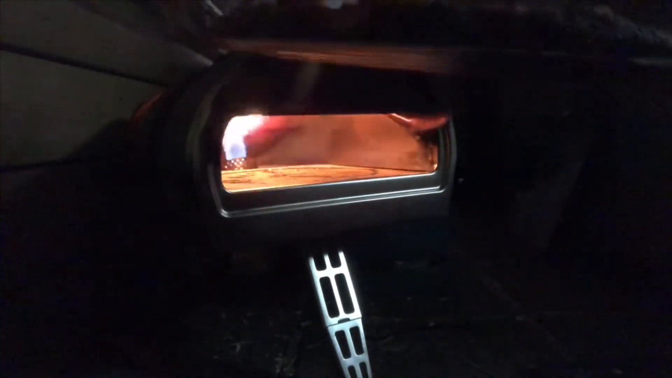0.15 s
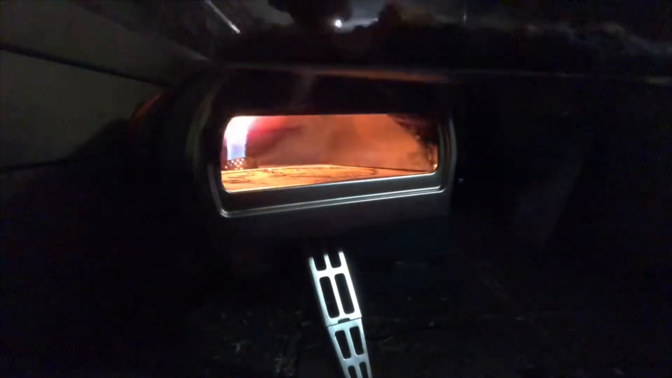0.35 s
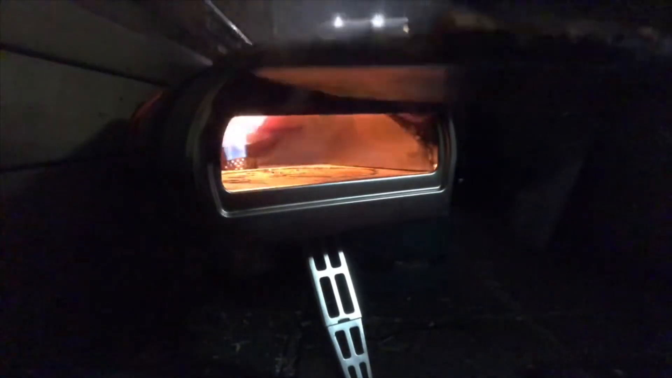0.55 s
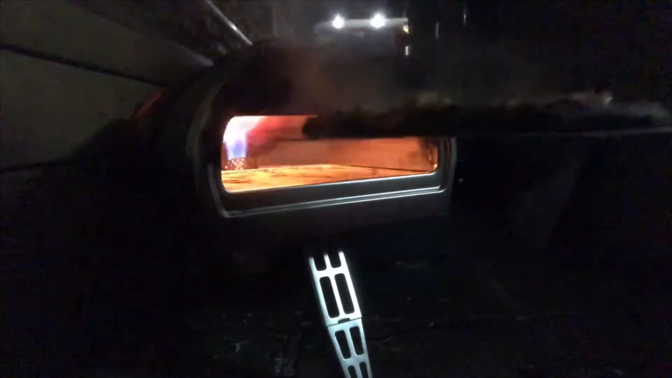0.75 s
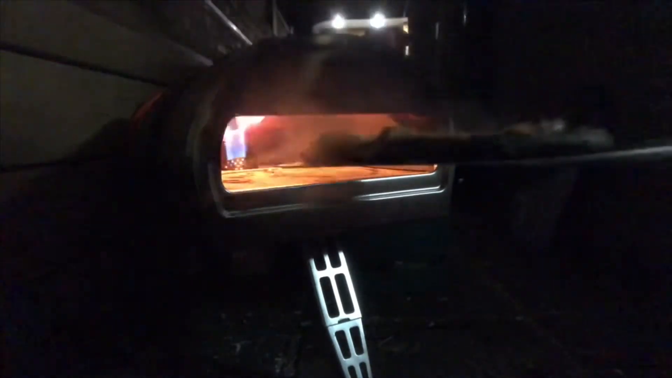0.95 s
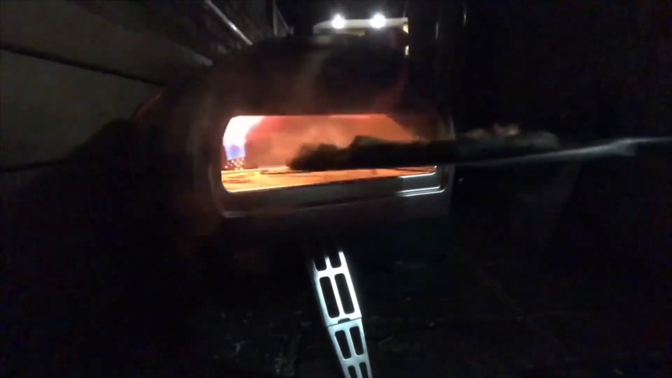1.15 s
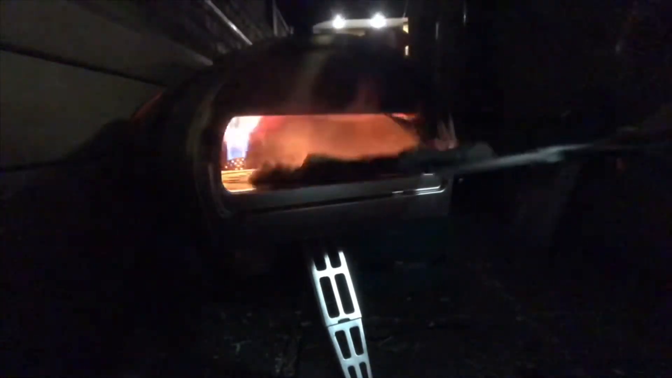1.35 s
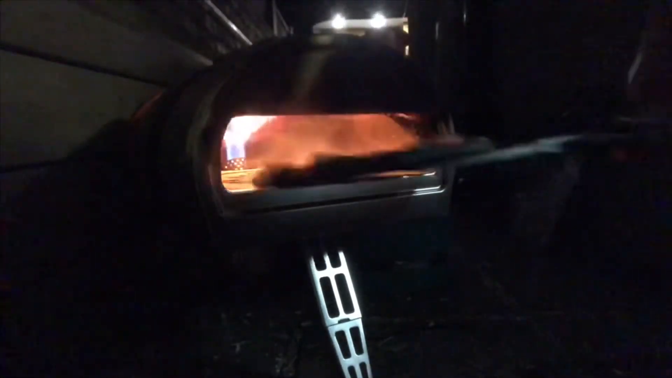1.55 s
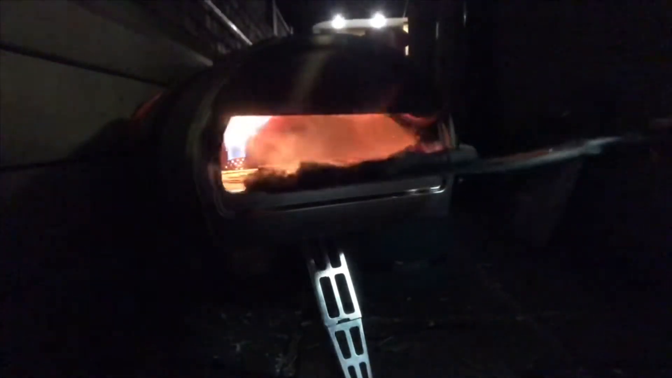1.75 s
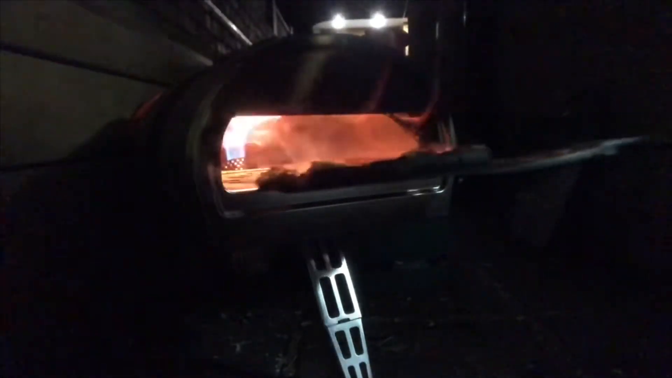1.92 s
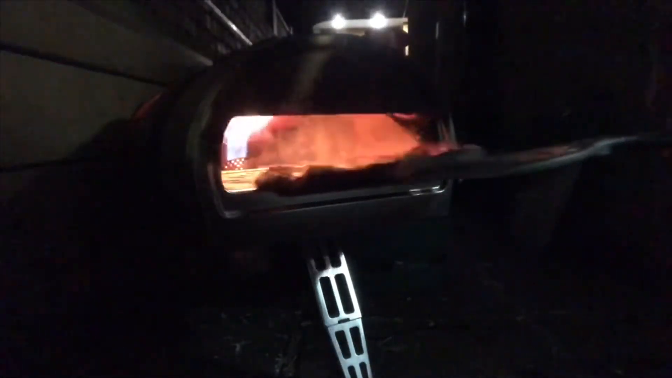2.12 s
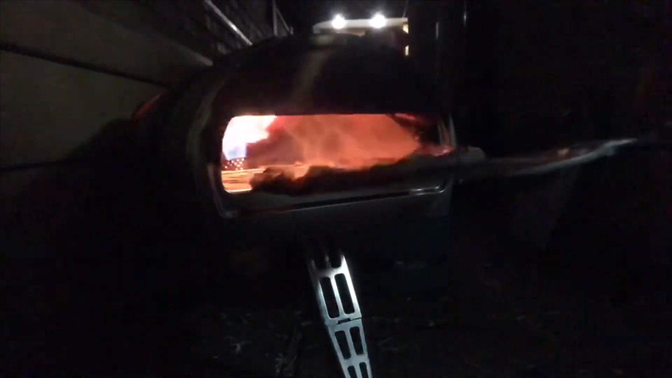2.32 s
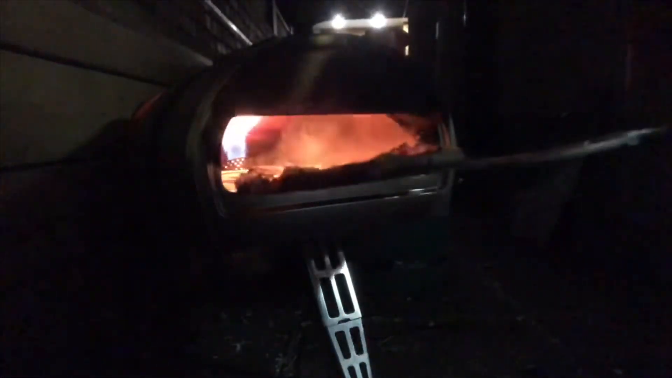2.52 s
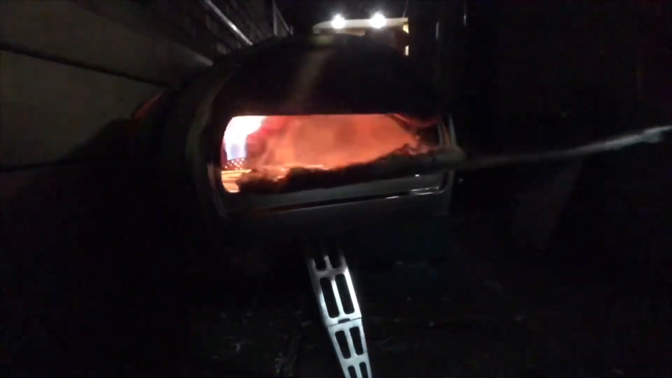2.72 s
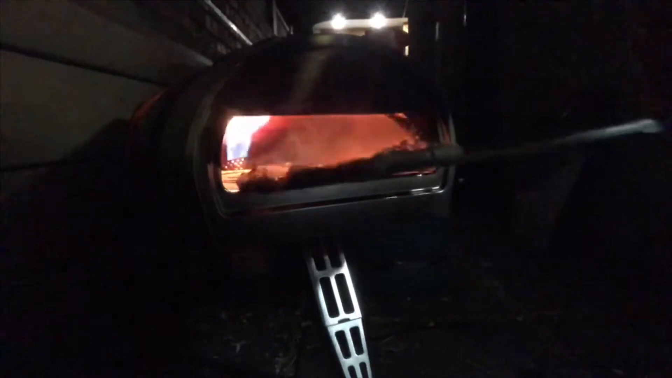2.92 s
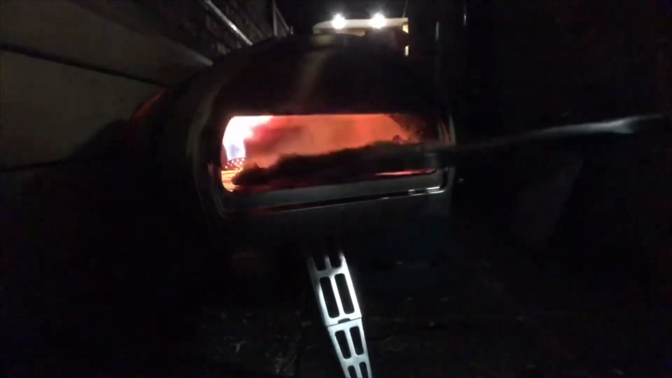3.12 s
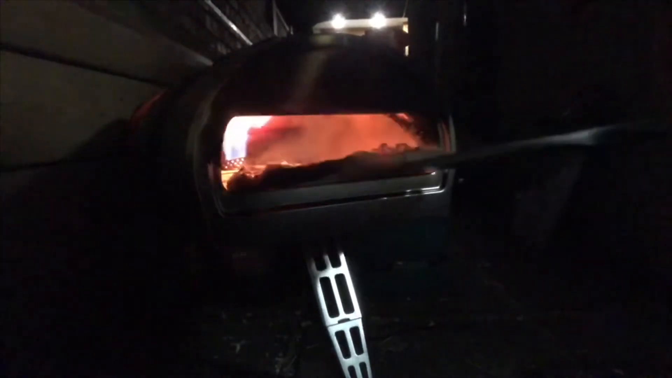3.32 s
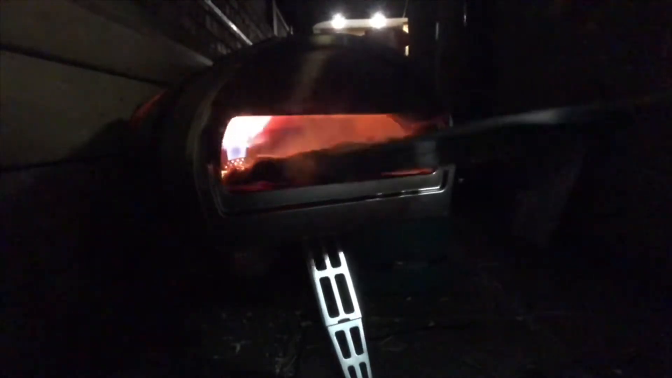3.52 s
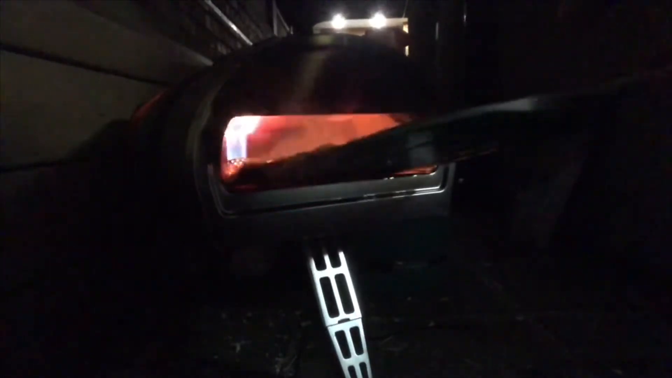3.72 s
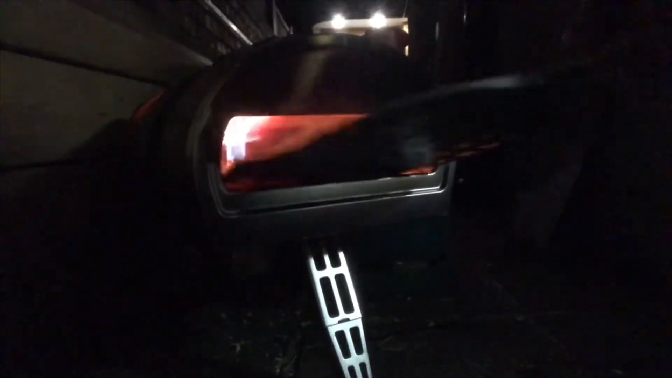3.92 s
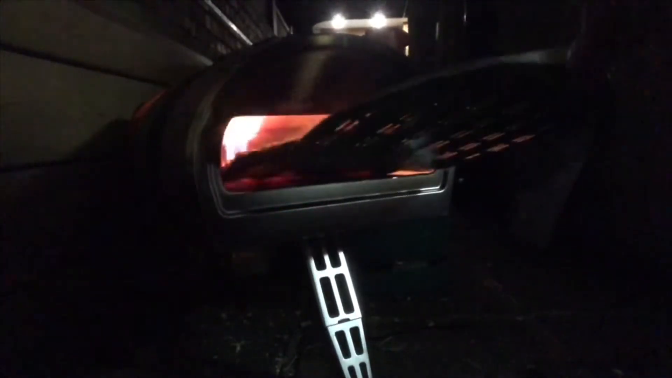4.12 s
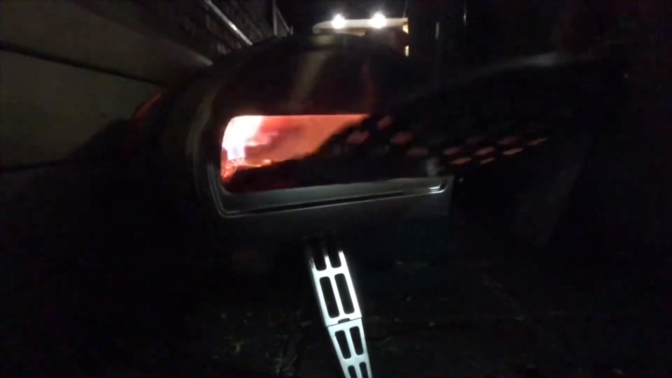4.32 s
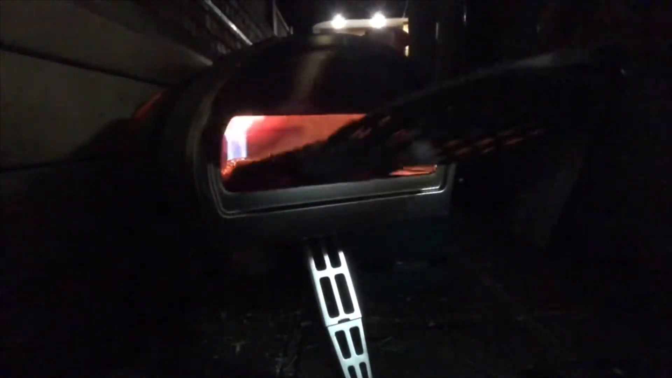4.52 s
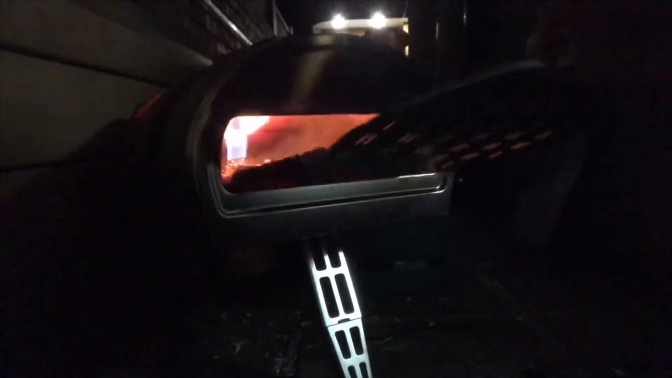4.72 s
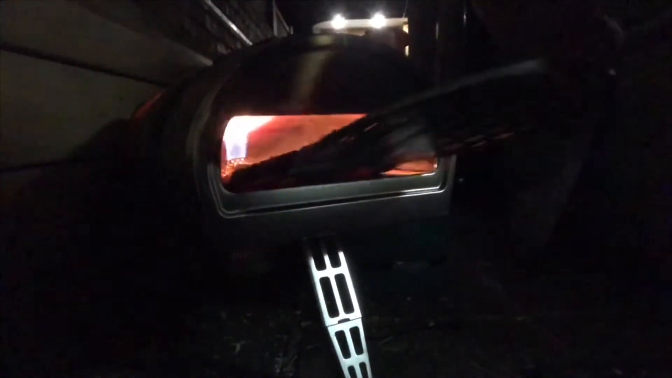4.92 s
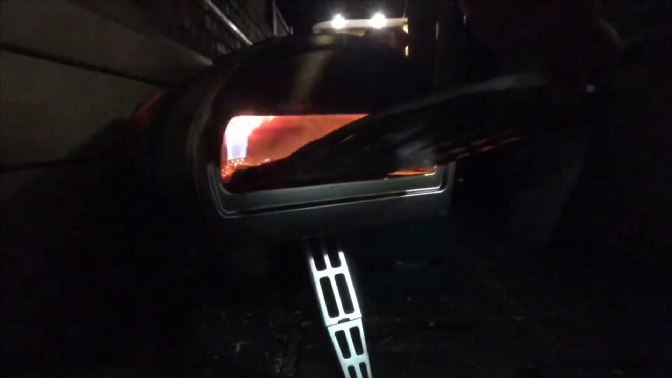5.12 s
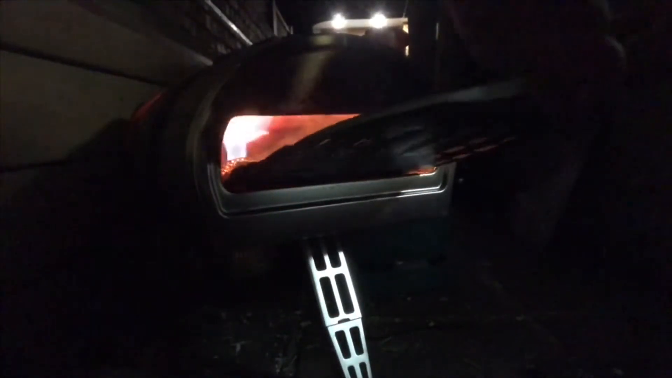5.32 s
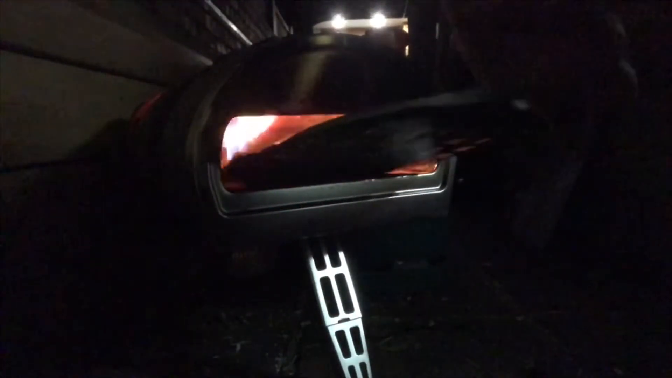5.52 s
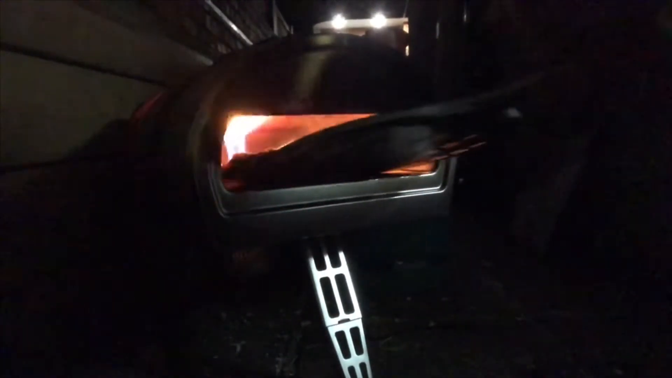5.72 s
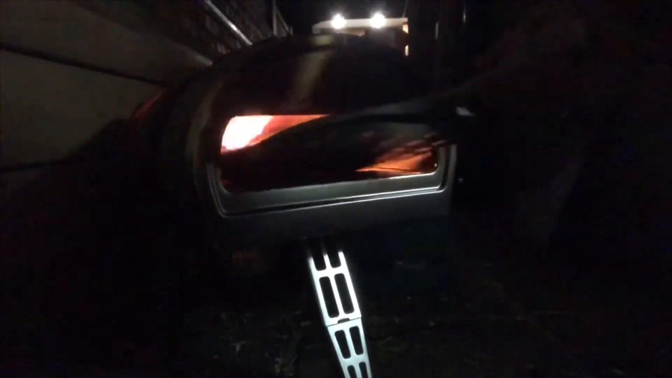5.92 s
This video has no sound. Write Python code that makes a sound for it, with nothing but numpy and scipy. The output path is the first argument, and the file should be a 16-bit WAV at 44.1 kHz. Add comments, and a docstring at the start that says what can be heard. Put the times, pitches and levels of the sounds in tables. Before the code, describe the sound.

A gas burner in a small outdoor pizza oven rumbles and hisses quietly and steadily throughout, heard in mono from in front. Around 0.2 to 0.4 seconds a few crumbs crackle in tiny dry snaps. At 1.4 seconds a thin metal peel lands on the stone floor with a clack and is worked back and forth in short, gritty scrapes, several a second, with light rubbing between them. Many shoves end in a brief low hum as the blade flexes. Irregular hollow knocks of its edge draw short booms from the oven, with a firm one at 1.8 seconds. Scrapes and knocks grow stronger around 3.8 to 4.1 seconds, then turn sparser while the tilted blade rings more freely until about 5.2. The loudest sound, a sharp clack, comes at 5.6 seconds, followed by strong rasping shoves at about 5.9 and 6 seconds.

```python
"""A gas burner rumbles and hisses and a few crumbs crackle: a small oven outdoors, heard in mono from
one spot in front of it. Then a thin metal peel lands on the stone floor and is worked back and forth.
Each shove drags the blade over grit and ends in a low hum as the peel flexes. Its edge knocks on
the stone, the sheet rings, and the oven cavity answers both the knocks and the grinding."""
import sys
import numpy as np
from scipy import signal
from scipy.fft import rfft, irfft, next_fast_len
from scipy.io import wavfile

SR = 44100
rng = np.random.default_rng(int(sys.argv[2]) if len(sys.argv) > 2 else 0)


def wrap_up_sound(samples):
    """Save the sound to the file named by the first command line argument, as 16-bit audio."""
    columns = np.atleast_2d(samples).T
    # keep every value between -1 and 1, then stretch to whole-number steps
    tamed = np.clip(columns, -1, 1)
    steps = np.round(tamed * 32767).astype(np.int16)
    wavfile.write(sys.argv[1], SR, steps)


N = 267246
TIME = np.arange(N) / SR
LANDING_S = 1.363   # the blade first touches the stone
GRIND_HZ, RASP_HZ, HISS_HZ = (400, 2000), (2000, 5000), (5000, 15500)
BOOM_LOSS = 0.23   # dB lost per dB of free ringing: a tilted blade passes less on to the oven

# shoves of the peel, at full speed from start to end: start_s, end_s, rise_s, level_db, pressure_db, hum_db
SHOVES = [(1.363, 1.413, .003, -40.5, -6, -48), (1.465, 1.507, 0.0022, -40, -10.5, -45),
          (1.599, 1.612, 0.017, -34.5, -7, -51), (1.703, 1.74, 0.016, -31.5, -6, -39.5),
          (1.78, 1.845, 0.028, -52.5, -13, -50), (1.918, 1.966, 0.014, -41.5, -13.5, -40.5),
          (1.977, 2.033, 0.03, -51, -3.5, -54), (2.187, 2.212, 0.0095, -42, 4, -40),
          (2.32, 2.328, 0.02, -40, 0, -38.5), (2.377, 2.402, 0.0047, -40.5, 5, -67),
          (2.483, 2.5, 0.013, -37, -8.5, -43), (2.547, 2.624, 0.022, -44, 0, -44),
          (2.688, 2.732, 0.014, -41, -12, -40), (2.808, 2.846, 0.022, -46, 4.5, -42),
          (2.995, 3.048, 0.027, -37.5, -2, -45), (3.266, 3.298, 0.01, -61, -10, -43),
          (3.508, 3.53, .018, -44, -6.5, -47.5), (3.606, 3.665, 0.028, -37.5, 5, -39.5),
          (3.728, 3.757, 0.0098, -38, -2.5, -50), (3.842, 3.885, 0.0073, -35, 0, -34),
          (3.972, 4.005, 0.025, -26.5, -6.5, -37), (4.04, 4.055, 0.014, -37, 4.5, -30.5),
          (4.068, 4.081, .005, -38, 6.5, -40), (4.248, 4.292, 0.0091, -53.5, 7, -69),
          (4.3, 4.307, 0.011, -42, -16, -68), (4.53, 4.536, 0.0076, -32, -2, -47.5),
          (4.72, 4.773, 0.021, -39, 2.5, -53), (4.976, 5.228, 0.0089, -55.5, -7, -54),
          (5.285, 5.41, 0.025, -43, -9, -49), (5.545, 5.628, .018, -32, -10.5, -65.5),
          (5.752, 5.79, .017, -32.5, -10, -68), (5.862, 5.93, 0.016, -28, -6.5, -28.5),
          (6.014, 6.055, 0.019, -26.5, -12.5, -42)]
# bending modes of the whole peel: pitch_hz, gain_db, t60_s
BENDING_MODES = [(151, -10, 0.096), (206, -9.5, 0.22), (239.7, 1, 0.16), (320, -3.5, 0.082)]
# modes of the oven cavity: pitch_hz, gain_db, t60_s
CAVITY_MODES = [(316.4, 2.5, 0.13), (360, -3.5, 0.14), (461.6, -2.5, 0.093), (569, 4, 0.04),
                (646, -8.5, 0.1), (717.4, -13.5, 0.28), (775.5, -7.5, 0.1), (1050, -4, 0.066)]
# spectrum of metal rubbing on stone: frequency_hz, gain_db
FRICTION_SPECTRUM = [(210, -5), (350, 6.5), (398, -3), (696, -9), (857, -2), (1240, -3), (1360, -7),
                     (2100, -11), (5840, -8), (11800, -13), (16000, -20)]


def scrape(judder_db, flicker_db, squeal_range_hz):
    """Each shove drags the blade over grit: pressed hard it grinds low and hollow, held lightly it hisses."""
    # hollow centre of the grind, lower and stronger under pressure: pressure_db, pitch_hz, gain_db
    grind_centre = [(-7.5, 1666, -1.5), (-2.5, 1346, 5), (2.5, 1200, 8), (3.5, 1244, 6.5)]
    pressures, *centre = np.transpose(grind_centre)
    friction = hollow(colour(grit(per_s=2400, size_db=3, smooth_db=-4.5), FRICTION_SPECTRUM))
    judder = judder_db * drift(per_s=260)   # stick and slip shake all three bands together
    shakes = [from_db(db + judder + flicker_db * drift(per_s=38)) for db in (0, 0, 0.3)]
    low_hz, high_hz = squeal_range_hz
    out = np.zeros(N)
    for start, end, rise, level, pressure, _ in SHOVES:
        place, pitch = rng.random(2)
        span = slice(int((start - 0.1) * SR), int((end + 0.3) * SR))
        centre_hz, centre_db = (np.interp(pressure, pressures, column) for column in centre)
        squeal_hz = low_hz * (high_hz / low_hz) ** pitch
        hiss_db = -1.5 - 0.3 * pressure - 0.13 * free_ring_db(end)   # a tilted blade sweeps less grit
        rub = np.roll(friction, int(place * N))[span]
        grind = from_db(centre_db) * resonate(rub, centre_hz, width_hz=57)
        squeal = resonate(rub, squeal_hz, width_hz=140)
        rub = roll_off(rub + grind + squeal, top_hz=11800 * from_db(hiss_db))   # light shoves reach higher
        bands = zip((GRIND_HZ, RASP_HZ, HISS_HZ), (pressure, 0, hiss_db), shakes)
        shove = sum(from_db(level + db) * shake[span] * rms_one(band(rub, hz)) for hz, db, shake in bands)
        shove *= shove_speed(TIME[span], start, end, rise)
        shove = sheet_ring(shove, ring_db=free_ring_db(end) + 0.5, width_hz=25)
        add(out, TIME[span][0], reflections(shove, wet_db=2, t60_s=0.027))
    return out


def shove_speed(time, start, end, rise, coast_s=0.026):
    """Speed of the blade in one shove, 0 to 1: it rises, holds and coasts to a stop."""
    envelope = np.exp(-np.maximum(start - time, 0) / rise - np.maximum(time - end, 0) / coast_s)
    return envelope * (time > LANDING_S)


def knocks(clack_db, clack_width_hz, crunch_s, tail_s, tail_db, boom_limit_db):
    """The edge hits the stone: a brief crunch, a hollow clack, a thud of the peel and a boom of the cavity."""
    # blows (crunch and thud relative to level, hiss to crunch): time_s, level_db, crunch_db, hiss_db, thud_db
    blows = [(1.363, -27, 1, -14, -12), (1.439, -28.5, -11, -12, 1), (1.462, -44, 2, 0, 4),
             (1.562, -35.5, -6, -6, 11), (1.849, -17.5, -12, -0.5, -7.5), (2.185, -24, -17, -1, -7),
             (2.213, -27.5, -15, 3, -6), (2.394, -28.5, -7, -7, -7), (2.453, -29, -7, -6, -6),
             (2.576, -23.5, -6, -2.5, -13), (2.792, -28.5, -9, -18, 1.5), (3.133, -29.5, 0.5, -5, 2),
             (3.335, -33, -11.5, 4, -12), (3.414, -40, -1, 3, -1), (3.567, -40, 8, -7, -10),
             (3.801, -28.5, -7.5, -8, -3), (3.844, -19, -36, 1, -22), (4.011, -18, 1, -7, -8),
             (4.055, -32.5, 8.5, -6, -3), (4.196, -33, -7, -13, -2), (4.475, -26, -5, 0.5, 3),
             (4.64, -31, -7, -8.5, -5), (4.787, -24.5, -10, -2.5, -3), (5.115, -38, -10.5, -17, -2),
             (5.257, -38, 4.5, -2, -5), (5.463, -23.5, -15, -9, -13), (5.616, -4, -13, -1.5, -7),
             (5.682, -24, -13, 4, 3), (5.864, -21.5, -18, 6, -6)]
    # harder blows clack lower: level_db, pitch_hz
    clack_pitch = [(-39, 1240), (-22.5, 1240), (-1, 924)]
    age, out = TIME[:SR // 3], np.zeros(N)
    fade = np.exp(-age / crunch_s) + from_db(tail_db) * np.exp(-age / tail_s)
    fade_rms = np.sqrt(np.mean(fade ** 2))
    build = 1 - np.exp(-age / 0.0058)   # the low modes take a few cycles to fill
    bite = 1 - np.exp(-age / 0.00044)   # the edge digs into the grit just after it lands
    for s, level, crunch_db, hiss_db, thud_db in blows:
        hz = np.interp(level, *np.transpose(clack_pitch))
        burst = rng.standard_normal(len(age)) * fade
        force = burst + 5.6 * (age == 0)   # the first contact carries most of the force
        clack = hollow(resonate_twice(force, hz, clack_width_hz))
        clack = rms_one(band(clack, (300, 1.365 * hz)))   # a blunt contact has little above its centre
        rasp = rms_one(band(burst * bite, RASP_HZ))
        hiss = rms_one(band(roll_off(burst * bite, top_hz=4270), HISS_HZ))
        crunch = sheet_ring(rasp + from_db(hiss_db) * hiss, ring_db=3, width_hz=7.2)
        hit = fade_rms * (from_db(clack_db) * clack + from_db(crunch_db + 0.5) * crunch)
        thud = from_db(level + thud_db - 5) * struck(BENDING_MODES, age, spread_db=4)
        boom_db = min(level - 12 - BOOM_LOSS * free_ring_db(s), boom_limit_db)
        boom = from_db(boom_db) * struck(CAVITY_MODES, age, spread_db=3.5)
        add(out, s, from_db(level) * hit + build * (thud + boom))
    return disperse(band(out, (115, 16000)), corner_hz=260, stages=12)


def flex(hum_db, wander_hz, rough_db, rumble_db, lead_s, half_s):
    """Just before a shove ends the blade catches: the main bending mode hums and other low modes shake."""
    swell = np.sqrt(sum(from_db(db) ** 2 * bell_curve(end - lead_s, half_s) for _, end, *_, db in SHOVES))
    hum_hz = BENDING_MODES[2][0] + wander_hz * drift(per_s=38)
    hum = np.sqrt(2) * np.sin(2 * np.pi * np.cumsum(hum_hz) / SR)
    shaking = rng.standard_normal(N)
    cavity = sum(from_db(db) * resonate(shaking, hz, width_hz=37) for hz, db, _ in CAVITY_MODES[:3])
    rumble = rms_one(cavity + 1.15 * resonate(shaking, BENDING_MODES[1][0], width_hz=81))
    return swell * (from_db(hum_db + rough_db * drift(per_s=110)) * hum + from_db(rumble_db) * rumble)


def light_rub(gain_db, unrest_db):
    """Once it has landed, the blade keeps rubbing lightly, also between shoves."""
    # strength of the light rubbing: time_s, level_db
    rub_levels = [(1.4, -50), (1.95, -54.5), (2.1, -57), (2.3, -49), (3.2, -54), (4.4, -54.5), (4.9, -55),
                  (6.06, -54)]
    friction = hollow(colour(grit(per_s=1500, size_db=2.5, smooth_db=5), FRICTION_SPECTRUM))
    rub = rms_one(sheet_ring(band(friction, (400, 11000), order=1), ring_db=-0.5, width_hz=62))
    level_db = gain_db + np.interp(TIME, *np.transpose(rub_levels)) + unrest_db * drift(per_s=28)
    return rub * from_db(level_db) * (TIME > LANDING_S)


def grit(per_s, size_db, smooth_db):
    """Grains snap under the blade, over the smooth rub of stone."""
    sizes = from_db(size_db * np.minimum(rng.exponential(1, N), 4)) * rng.choice([-1, 1], N)
    snaps = rms_one(sizes * (rng.random(N) < per_s / SR))
    return snaps + from_db(smooth_db) * rng.standard_normal(N)


def sheet_ring(x, ring_db, width_hz):
    """The blade stores part of the energy and rings with it; higher modes die sooner."""
    # thin ringing modes of the sheet: pitch_hz, gain_db
    modes = [(1545, 11.5), (1735, 2), (1887, 7), (2024, 2), (2312, -6), (2495, 3.5), (2642, 3), (2970, 3.5),
             (3058, -0.5), (3470, 6.5), (3862, 2), (4303, -2), (4506, -1), (4877, -7), (5679, -38),
             (5995, -1), (6126, -19), (6428, 0.5), (7190, 5), (9324, -9)]
    contact_db = 3 * rng.uniform(-1.5, 1, len(modes))   # each place of contact favours other modes
    rings = sum(from_db(db + extra + ring_db) * resonate(x, hz, width_hz * np.sqrt(hz / modes[0][0]))
                for (hz, db), extra in zip(modes, contact_db))
    return rms_one(x + rings) * np.sqrt(np.mean(x ** 2))


def free_ring_db(s):
    """The blade rings more freely while it is tilted up off the stone."""
    # freedom of the blade to ring: time_s, ring_db
    freedom = [(1.3, -7.5), (4.02, -0.5), (4.1, 8), (4.6, 9), (5.2, 1), (6.06, -11.5)]
    return np.interp(s, *np.transpose(freedom))


def disperse(x, corner_hz, stages):
    """Bending waves travel slower at low pitch, so each blow chirps downwards."""
    k = np.exp(-2 * np.pi * corner_hz / SR)
    return signal.sosfilt(np.tile([-k, 1, 0, 1, -k, 0], (stages, 1)), x + 1e-18)


def hollow(x):
    """Blade and oven mouth resonate and give the contact a hollow tone."""
    # their broad resonances: pitch_hz, width_hz, gain_db
    resonances = [(706, 61, 5), (1000, 20, -9), (1080, 80, -6), (1220, 27, 1)]
    return x + sum(from_db(db) * resonate(x, hz, width) for hz, width, db in resonances)


def reflections(x, wet_db, t60_s):
    """Dense short reflections in the oven comb the upper range, differently for each place of the blade."""
    age = TIME[:SR // 8]
    tail = rng.standard_normal(len(age)) * from_db(-60 * age / t60_s) * (1 - np.exp(-age / 0.00063))
    tail = band(tail / np.linalg.norm(tail), (900, 16000), order=2)
    wet = from_db(wet_db)
    return (x + wet * signal.fftconvolve(x, tail)[:len(x)]) / np.sqrt(1 + wet ** 2)


def cavity_drone(gain_db, width_hz):
    """Grinding on the stone sets the oven cavity sounding."""
    grind = sum(from_db(level + pressure) * shove_speed(TIME, start, end, rise)
                for start, end, rise, level, pressure, _ in SHOVES)
    shaking = rng.standard_normal(N)
    cavity = rms_one(sum(from_db(db) * resonate(shaking, hz, width_hz) for hz, db, _ in CAVITY_MODES))
    return from_db(gain_db - BOOM_LOSS * free_ring_db(TIME)) * grind * cavity


def crumbs(gain_db, decay_s, tail_s, tail_db, width_hz):
    """Crumbs crackle in tiny dry snaps, each with its own pitch."""
    # snaps of the crumbs: time_s, relative_peak_db, pitch_hz
    snaps = [(0.1732, -39, 5170), (0.1774, -47, 6870), (0.1834, -47, 10500), (0.1904, -48, 7970),
             (0.2044, -39, 11900), (0.2276, -28.5, 4660), (0.3147, -40, 5650), (0.3214, -44, 3570),
             (0.375, -41, 6000)]
    age, out = TIME[:SR // 25], np.zeros(N)
    fade = np.exp(-age / decay_s) + from_db(tail_db) * np.exp(-age / tail_s)
    for s, db, hz in snaps:
        snap = resonate(rng.standard_normal(len(age)) * fade, hz, width_hz)
        add(out, s, from_db(db + gain_db) * snap / np.abs(snap).max())
    return out


def rustle(centre_s, half_s, level_db):
    """Fine dry grains shift as the peel is brought up."""
    grains = rms_one(band(grit(per_s=730, size_db=0, smooth_db=-3), (3000, 14000), order=1))
    return grains * from_db(level_db) * bell_curve(centre_s, half_s)


def burner(flame_db, jet_db, flutter_db):
    """The flame rumbles; the gas jet hisses in the resonances of its mixing tube."""
    # spectrum of the flame: frequency_hz, gain_db
    flame_spectrum = [(22, -39), (33, -6.5), (48, -7), (95, 0.5), (130, -2.5), (210, -3), (340, -14.5),
                      (1400, -18.5), (1800, -26), (2900, -30), (4000, -34.5), (5200, -31.5), (8500, -39.5),
                      (16000, -41.5)]
    # resonances of the tube: pitch_hz, nominal_width_hz, gain_db
    tube_modes = [(2223, 100, -3), (2343, 206, 6), (3256, 380, -1.5), (4650, 74, -2), (5960, 100, -0.5),
                  (7200, 470, -6.5), (7630, 360, -8.5), (14600, 400, -12)]
    flame = rms_one(colour(rng.standard_normal(N), flame_spectrum)) * from_db(flutter_db * drift(per_s=16))
    gas = rng.standard_normal(N)
    jet = rms_one(sum(from_db(db) * resonate_twice(gas, hz, 1.4 * width) for hz, width, db in tube_modes))
    return from_db(flame_db) * flame + from_db(jet_db) * jet


def struck(modes, age, spread_db):
    """Decaying modes of alternating sign, each hit with a strength of its own."""
    return sum(from_db(db + spread_db * rng.standard_normal() - 60 * age / t60)
               * np.cos(2 * np.pi * hz * age) * (-1) ** k for k, (hz, db, t60) in enumerate(modes))


def resonate(x, hz, width_hz):
    """Two-pole resonance with gain 1 at its peak."""
    r = np.exp(-np.pi * width_hz / SR)
    feedback = [1, -2 * r * np.cos(2 * np.pi * hz / SR), r * r]
    return signal.lfilter(np.array([1, 0, -1]) * (1 - r * r) / 2, feedback, x + 1e-18)


def resonate_twice(x, hz, width_hz):
    """Two equal resonances in series, for steeper flanks."""
    return resonate(resonate(x, hz, width_hz), hz, width_hz)


def band(x, edges_hz, order=3):
    """Causal band-pass."""
    return signal.sosfilt(signal.butter(order, edges_hz, "band", fs=SR, output="sos"), x + 1e-18)


def roll_off(x, top_hz):
    """One-pole roll-off of the treble."""
    k = np.exp(-2 * np.pi * top_hz / SR)
    return signal.lfilter([1 - k], [1, -k], x)


def colour(x, spectrum):
    """Give a steady noise a smooth spectrum."""
    hz, db = np.transpose(spectrum)
    size = next_fast_len(N)
    bins_hz = np.maximum(np.fft.rfftfreq(size, 1 / SR), 1)
    gain = from_db(np.interp(np.log(bins_hz), np.log(hz), db))
    return irfft(rfft(x, size) * gain, size)[:N]


def drift(per_s):
    """Random wander with an rms of 1."""
    knots = rng.standard_normal(int(N / SR * per_s) + 2)
    return rms_one(np.interp(TIME * per_s, np.arange(len(knots)), knots))


def bell_curve(centre_s, half_s):
    """Smooth swell to 1 and back."""
    return np.exp(-np.minimum(((TIME - centre_s) / half_s) ** 2, 50))


def add(track, s, sound):
    """Mix a short sound into a track at time s."""
    start = int(np.clip(s * SR, 0, N - 1))
    track[start:start + len(sound)] += sound[:N - start]


def from_db(db):
    """Decibels to gain."""
    return 10 ** (np.asarray(db) / 20)


def rms_one(x):
    """Scale to an rms of 1."""
    return x / np.sqrt(np.mean(x ** 2) + 1e-20)


def scene():
    """Peel, crumbs and burner at one microphone in front of the oven, the same on both channels."""
    peel = scrape(judder_db=2, flicker_db=0.5, squeal_range_hz=(2506, 8480))
    peel += knocks(clack_db=-4.5, clack_width_hz=1020, crunch_s=0.0051, tail_s=0.032, tail_db=-14.5,
                   boom_limit_db=-17.5)
    peel += light_rub(gain_db=1, unrest_db=0.5)
    peel += flex(hum_db=-2, wander_hz=7.18, rough_db=3.5, rumble_db=-14.5, lead_s=0.0014, half_s=0.031)
    oven = cavity_drone(gain_db=-13, width_hz=27)
    crackle = crumbs(gain_db=-0.5, decay_s=0.00039, tail_s=0.0076, tail_db=-22, width_hz=3100)
    crackle += rustle(centre_s=0.193, half_s=0.037, level_db=-56)
    mono = peel + oven + crackle + burner(flame_db=-53, jet_db=-60, flutter_db=0.36)
    return np.array([mono, mono])


def record(dry):
    """The highest peaks are rounded and the top is cut steeply."""
    ceiling, cutoff_hz = 0.85, 15900
    rounded = dry / (1 + (dry / ceiling) ** 4) ** 0.25
    return signal.sosfilt(signal.ellip(12, 0.1, 100, cutoff_hz, fs=SR, output="sos"), rounded)


dry = scene()
out = record(dry)
wrap_up_sound(out)
```